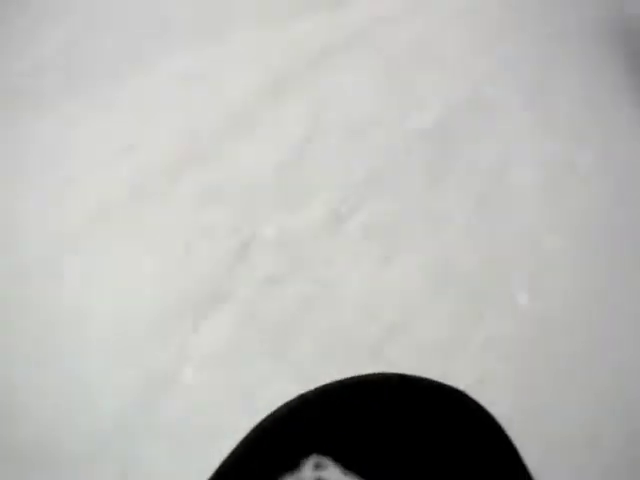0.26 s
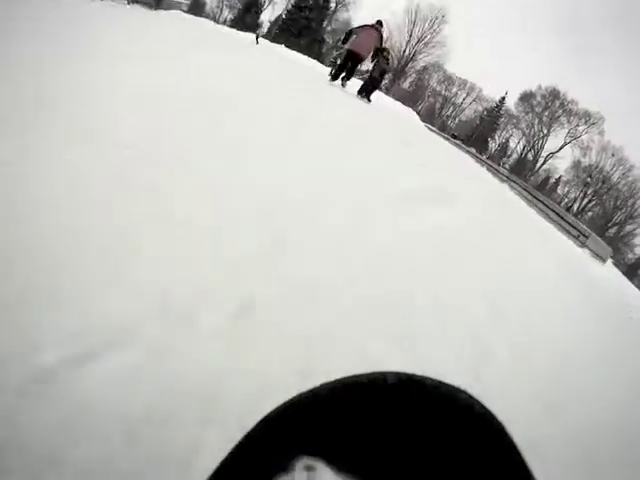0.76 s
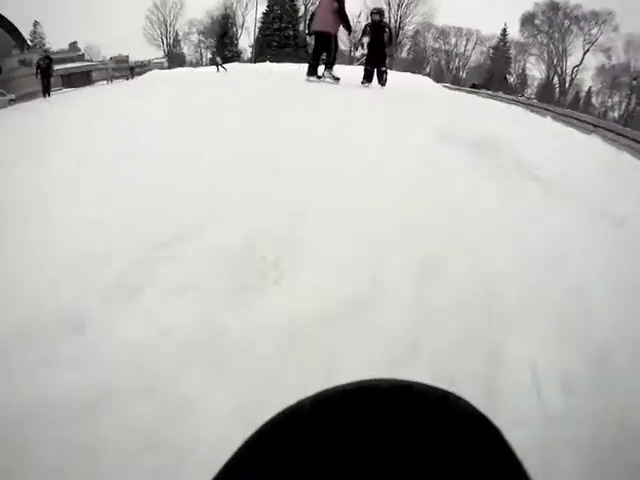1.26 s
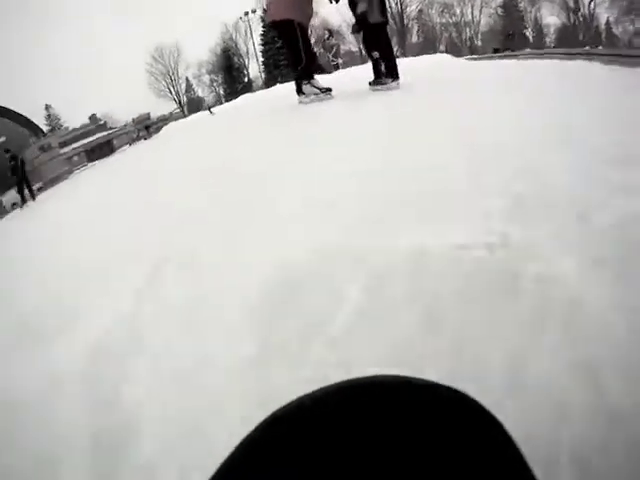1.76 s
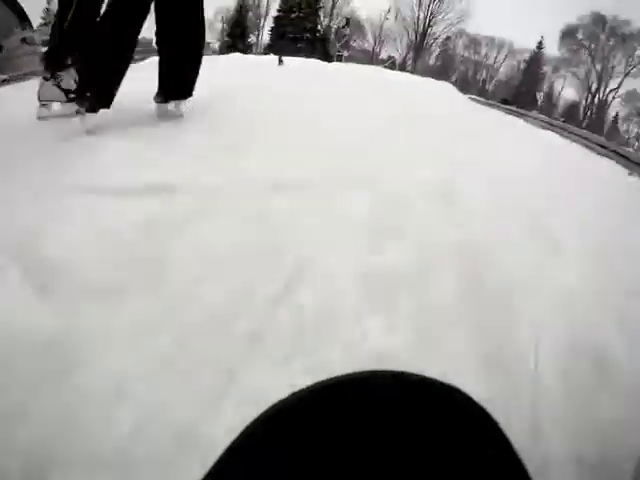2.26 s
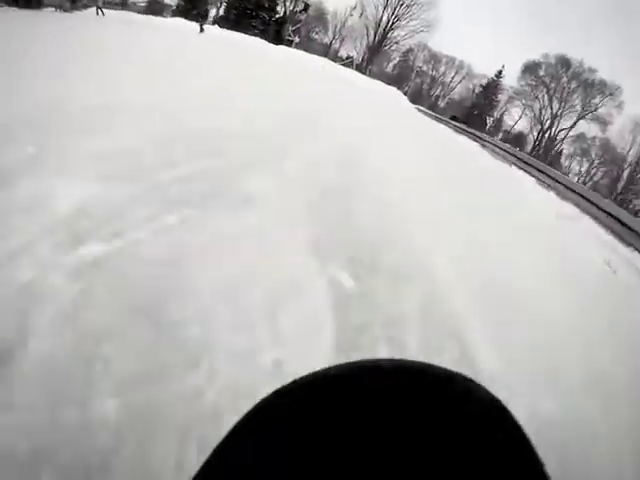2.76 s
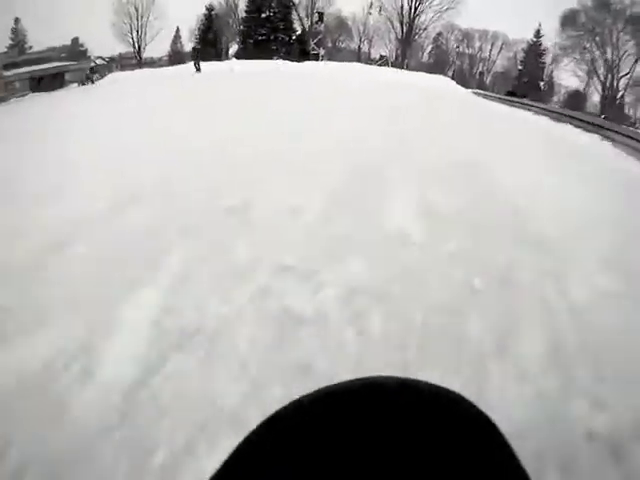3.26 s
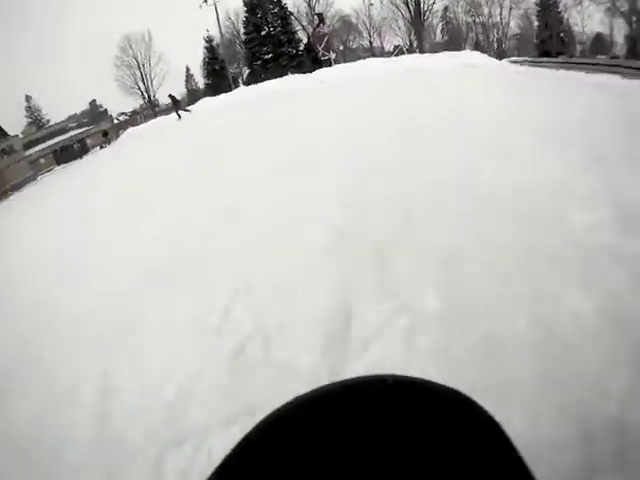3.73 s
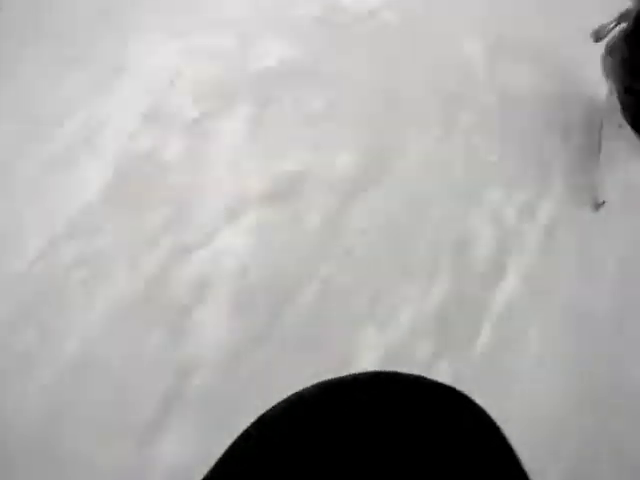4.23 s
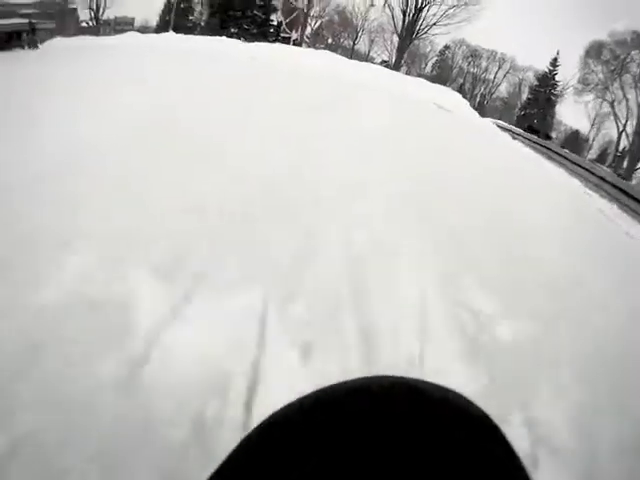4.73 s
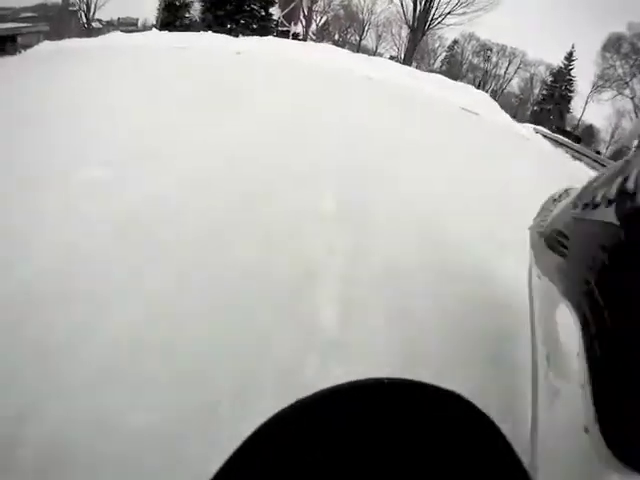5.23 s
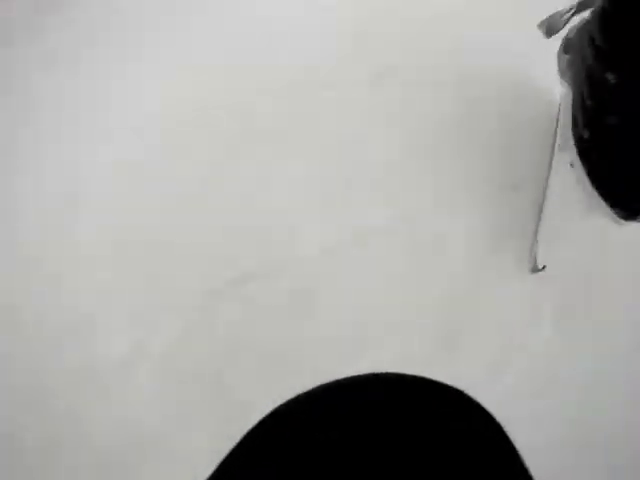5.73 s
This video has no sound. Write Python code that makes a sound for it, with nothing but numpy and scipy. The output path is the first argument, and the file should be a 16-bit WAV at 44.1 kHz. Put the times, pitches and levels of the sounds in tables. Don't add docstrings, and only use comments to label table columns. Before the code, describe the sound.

Very close, crunchy scraping of a skate blade on rough ice, bumping over ruts and spraying snow. Three pushes of about a second or more each grow to a hard, distorted peak and stop suddenly. Between them come a brief hush, a faint flick and grazing, and fluttering wind rumble. Open air, no echo, cheap harsh microphone.

```python
import sys
import numpy as np
from scipy import signal
from scipy.fft import rfft, irfft, next_fast_len
from scipy.io import wavfile
from scipy.ndimage import uniform_filter1d

SR = 44100
rng = np.random.default_rng(int(sys.argv[2]) if len(sys.argv) > 2 else 0)


def voltage_ratio(level):
    return 10 ** (np.asarray(level, float) / 20)


def wav_record(signal):
    frames = np.transpose(np.atleast_2d(signal))
    bounded = np.clip(frames, -1, 1)
    quanta = np.round(bounded * 32767).astype(np.int16)
    wavfile.write(sys.argv[1], SR, quanta)


N = 264153

# f/Hz, width/Hz, level/dB
BOOT_MODES = [(506, 190, -0.5), (715, 259, -0.36), (979, 136, 0.5), (1250, 280, -3), (1745, 660, -11.5)]
# f/Hz, width/Hz, level/dB
EDGE_MODES = [(1904, 470, -2.5), (2300, 790, -3.5), (2800, 252, 1.13), (3760, 360, -10), (4520, 820, -18.5)]
REST_LOAD_DB = -44


def rms_one(x):
    return x / np.sqrt(np.mean(x ** 2) + 1e-20)


def in_time(rows):
    s, *columns = np.transpose(rows)
    return [np.interp(np.arange(N) / SR, s, c) for c in columns]


def swells(rows):
    t = np.arange(N) / SR
    total = 0
    for centre, length, db in rows:
        phase = np.pi * np.clip((t - centre) / length, -.5, .5)
        total = total + db * np.cos(phase) ** 2
    return total


def drift(rate):
    r = np.exp(-16 * np.pi * rate / SR)
    white = rng.standard_normal(N // 8 + 2002)
    slow = signal.lfilter([1], [1, -2 * r, r * r], white)[2000:]
    return np.interp(np.arange(N) / 8, np.arange(len(slow)), rms_one(slow))


def coloured(spectrum):
    size = next_fast_len(N)
    hz, db = np.transpose(spectrum)
    grid = np.maximum(np.arange(size // 2 + 1) * SR / size, 1)
    shape = voltage_ratio(np.interp(np.log(grid), np.log(hz), db, left=-60, right=-80))
    return rms_one(irfft(rfft(rng.standard_normal(size)) * shape, size)[:N])


def body(force, modes, lean_hz=None, lean_db=0):
    out = 0
    for k, (hz, width, db) in enumerate(modes):
        r = np.exp(-np.pi * width / SR)
        zeros = [(1 - r * r) / 2, 0, (r * r - 1) / 2]
        poles = [1, -2 * r * np.cos(2 * np.pi * hz / SR), r * r]
        lean = 0 if lean_hz is None else lean_db * np.abs(np.log2(lean_hz / hz))
        out = out + (-1) ** k * voltage_ratio(db - lean) * signal.lfilter(zeros, poles, force + 1e-18)
    return out


def grit(per_s, spread_db):
    sizes = voltage_ratio(spread_db * np.minimum(rng.exponential(1, N), 5)) * rng.choice([-1, 1], N)
    return sizes * (rng.random(N) < per_s / SR)


def strides():
    # t/s, load/dB, edge bite/dB
    pushes = [
        [(0.0, -19.5, -27), (0.085, -25.5, -39)],
        [(0.96, -32, -36.5), (1.03, -31, -30.5), (1.44, -30.5, -31.5), (1.52, -27.5, -25.5),
         (1.604, -15, -20.5), (1.69, -23.5, -25.5), (1.83, -24.5, -28.5), (1.918, -14, -26),
         (1.988, -16, -26.5)],
        [(2.877, -32.5, -31.5), (2.963, -20.5, -25.5), (3.111, -33, -34.5), (3.221, -22, -19.5),
         (3.297, -31.5, -27.5), (3.39, -25, -27.5), (3.63, -30.5, -32.5), (3.86, -23, -32), (3.965, -22, -29)],
        [(4.69, -37, -36), (4.776, -25.5, -23), (4.842, -32, -33), (5.1, -32.5, -35), (5.37, -28, -35.5),
         (5.45, -19, -33.5), (5.53, -21, -27.5), (5.655, -21, -27), (5.683, -27, -33)],
    ]
    # t after lift/s, load/dB, edge bite/dB
    swing = [
        (0.016, -47, -52),
        (0.03, -47.5, -41),
        (0.07, -45, -37),
        (0.108, -49, -50),
        (0.22, -44.5, -49.5),
        (0.42, -44, -43.5),
        (0.62, -46.5, -40.5),
    ]
    # centre t/s, length/s, change/dB
    grazes = [(0.24, 0.12, 7), (0.36, .14, -6), (0.52, 0.27, 6), (0.8, 0.38, -6), (2.05, 0.14, 9.5),
              (2.5, 0.35, 10), (4.35, 0.33, 10.5), (4.53, .16, -8), (5.735, .12, -14), (5.83, 0.16, 9.5),
              (5.99, 0.35, 13.5)]
    rows = []
    for push in pushes:
        lift_s = push[-1][0]
        rows += list(push)
        rows += [(lift_s + s, load_db, bite_db) for s, load_db, bite_db in swing]
    load_db, bite_db = np.array(in_time(rows)) + swells(grazes) * [[0.6], [1]]
    lean_hz = 571.3 * 2 ** (0.0082 * (load_db - REST_LOAD_DB))
    return load_db, bite_db, lean_hz


def wind():
    # t/s, level/dB, flutter share/dB
    strength = [(0.0, -21, -10), (0.1, -42, -13), (0.2, -39.5, -9), (0.27, -15.5, -8.5), (0.9, -22, -5.5),
                (1.03, -29, -7.5), (1.45, -19, -3.5), (1.82, -23, -7), (2.01, -39.5, -5.5), (2.2, -15, -4),
                (2.9, -26, -3.5), (3.52, -21, -10), (3.91, -28.5, 0.5), (3.99, -52.5, -3), (4.2, -16.5, -7),
                (5.42, -27.5, -5), (5.65, -44, -2), (5.99, -17, -8)]
    # centre t/s, length/s, change/dB
    lone_gusts = [(0.28, .05, 4), (0.34, .09, -19), (0.41, 0.043, -2), (0.52, 0.11, -9), (0.58, .06, 4),
                  (0.635, 0.063, -3), (2.33, 0.26, -6), (2.52, 0.12, 3.5), (2.6, .08, 1), (2.68, 0.17, 2),
                  (2.91, 0.092, -2.5), (3.04, 0.15, 2.5), (3.32, 0.25, -3.5), (4.45, .04, 9),
                  (4.53, .16, -5), (4.74, 0.37, -3.5), (5.07, 0.19, -7), (5.21, 0.11, 3), (5.8, .24, 5)]
    # f/Hz, density/dB
    rumble_spectrum = [(20, -8), (45, -1.5), (100, 1), (180, -6.5), (260, -9), (420, -27.5)]
    # f/Hz, density/dB
    flutter_spectrum = [(150, 0), (260, -2.5), (400, -2.5), (600, -7), (800, -27.5), (1500, -25),
                        (3000, -53.5), (5500, -38)]
    rumble_db, flutter_db = in_time(strength)
    rumble_db = rumble_db + swells(lone_gusts)
    gusts = drift(33.0)
    rumble = rms_one(coloured(rumble_spectrum) * voltage_ratio(1.33 * gusts + 0.66 * drift(7.8)))
    flutter = rms_one(coloured(flutter_spectrum) * voltage_ratio(2.6 * gusts + 2.6 * drift(23.7)))
    return voltage_ratio(rumble_db) * (rumble + voltage_ratio(flutter_db + 3.0) * flutter)


def glide(boot_db, edge_db, lean_hz):
    # centre t/s, length/s, spray/dB
    snow = [(0.79, 0.22, 6), (1.27, 0.33, 17), (1.53, 0.45, 18), (2.06, .1, 7), (2.52, 0.46, 17.5),
            (2.95, .5, 14), (3.24, .3, 23), (3.42, .2, 12), (3.6, .3, 7), (2.29, 0.29, -17),
            (4.16, 0.17, -10), (4.33, 0.33, 11.5), (4.47, .14, -7), (4.72, 0.51, 11), (5.08, .3, -7.5),
            (5.8, 0.29, 2)]
    # f/Hz, density/dB
    spray_spectrum = [(1500, -10), (3000, 3), (4300, -4), (5300, -3), (6200, -14)]
    spray_db = -54 + swells(snow)
    chatter = drift(47.4) * np.clip(1 - 0.025 * (boot_db + 31), .3, 1)
    boot_force = grit(4000, spread_db=3.0) * voltage_ratio(2.7 * chatter + 2.5 * drift(30.6))
    boot = body(boot_force, BOOT_MODES, lean_hz, lean_db=4.0)
    boot = signal.sosfilt(signal.butter(2, 450, "high", fs=SR, output="sos"), boot)
    edge_force = grit(3500, spread_db=2.5) * voltage_ratio(2.9 * chatter + 3.1 * drift(79))
    edge = body(edge_force, EDGE_MODES)
    spray = coloured(spray_spectrum) * voltage_ratio(4.4 * chatter + 2.6 * drift(25))
    out = voltage_ratio(boot_db + 4.5) * rms_one(boot)
    out += voltage_ratio(edge_db + 4.5) * rms_one(edge)
    return out + voltage_ratio(spray_db + 3.0) * rms_one(spray)


def jolts(load_db, lean_hz):
    # t/s, peak level/dB, crack/dB, length/ms
    ruts_and_chips = [(0.038, 1.5, -11, 4.7), (0.052, 8, -13, 4.5), (0.073, 5, -16, 6.8), (0.142, -14, 1, 2.1),
                      (0.17, -11, -0.5, 4.4), (0.552, -8.5, -6.5, 7.2), (0.611, -3, -7.5, 5.4),
                      (0.622, -1, -3.5, 4.1), (0.713, -1.5, -10.5, 5.8), (0.742, -4, -6.5, 3.5),
                      (0.776, -11, -7, 3), (0.936, 9.5, -8, 2.93), (0.992, -8, -0.3, 6.8),
                      (1.167, 5.5, -18.5, 3.3), (1.236, -3, -9, 4.7), (1.298, 1.5, -11, 2.5),
                      (1.327, -3, -6.5, 5), (1.431, -1.5, -8, 5.3), (1.523, -4.5, -10, 7.8),
                      (1.536, 3.5, -9, 5.2), (1.563, -0.6, -6, 4.0), (1.603, -6.5, -7, 4.8),
                      (1.675, -10, -8, 3.1), (1.724, -5.5, -13, 5.5), (1.831, -1.5, -12, 4.2),
                      (1.878, 9, -29, 3.1), (1.907, 4, -24, 4.3), (1.921, 6, -25, 3.1), (1.941, 3, -13, 4.7),
                      (1.955, 3, -10, 12),
                      (2.036, -5.5, 0, 5), (2.464, -7.5, -11.5, 4.1), (2.591, 3.7, -14, 3.9),
                   (2.694, -4.5, -3.5, 3.2), (2.758, -7, -11, 2.9), (2.783, -1.5, -9.5, 5.7),
                   (2.803, 5, -10, 2.4), (2.851, 6, -16.5, 4.7), (2.939, -4, -14, 3.7),
                   (2.978, 3, -16, 6.6), (3.025, -6, -2, 3.8), (3.051, 7.5, -15, 3.5),
                   (3.086, 1.5, -6.5, 5.3), (3.109, 1.5, -11, 5.8), (3.131, -9, -8, 4.1),
                   (3.188, 1, -13, 9.3), (3.281, 3.5, -15, 4.6), (3.448, -2.5, -16, 6.2),
                   (3.527, 0.5, -11.5, 3.1), (3.618, 1, -5, 5.2), (3.647, 7.5, -9.5, 5.4),
                   (3.726, -4, -5.5, 2.2), (3.737, 1.5, -12.5, 4.9), (3.759, 6, -10, 1.84),
                   (3.792, -5, -11, 5.8), (3.83, -1, -6.5, 4.7), (3.859, -0.5, -8.5, 10.5),
                   (3.908, 0.5, -19, 5.9), (3.922, 8.5, -6.5, 3.9), (3.945, 5, -21, 5.1),
                      (4.024, -7.5, 1.5, 4.3), (4.039, -12.5, -1.5, 2.1), (4.305, -10, -8.5, 6.6),
                 (4.615, -14, -2, 4.6), (4.648, -16.5, 2, 2.7), (4.678, -4.5, -8.5, 2.4),
                 (4.693, 2, -13.5, 10), (4.728, -9, -5.5, 4.0), (4.768, -3, -7, 4.7), (4.783, 0, -23, 4.3),
                 (4.809, -6.5, -20, 4.7), (4.836, 7, -15.5, 3.45), (4.899, -7.5, -12, 2.7),
                 (4.932, 7.5, -17.5, 3.6), (4.983, -3, -10.5, 6.2), (5.006, 5.5, -13, 4.8),
                 (5.141, -6, -15, 7), (5.186, -4, -11, 4.6), (5.22, -5.5, -31, 6.1), (5.256, 0.3, -21, 6.2),
                 (5.282, -11, -22.5, 2.9), (5.33, -14, -21, 4.1), (5.36, 1, -17.5, 3.15),
                 (5.403, -4, -12, 7.7), (5.441, 3.5, -18, 4.2), (5.534, -7, -21, 1.84),
                 (5.586, 6.5, -32, 1.8), (5.604, 3.5, -30.5, 1.4), (5.666, -2.5, -20.5, 4.2),
                 (5.814, -10.5, -3, 3)]
    ruts = np.array(ruts_and_chips)
    s, db, crack_db, ms = ruts.T[:, :, None]
    at = np.round(s * SR).astype(int)
    thud_db = -3 - 0.7 * (load_db[at] - REST_LOAD_DB)
    thud_db = thud_db - 20 * voltage_ratio(2 * np.minimum(crack_db, 0))
    lean_hz = 0.9 * lean_hz[at]
    low, high = rng.standard_normal((len(s), 2, 1500)).transpose(1, 0, 2)
    u = np.minimum(np.arange(1500) / SR / (np.clip(ms, 1, 14) / 1000), 1)
    swell = np.sin(np.pi * u ** 0.62) ** 0.66

    push = voltage_ratio(db + thud_db) * np.sin(2 * np.pi * u) * np.sign(low[:, :1])
    thud = signal.sosfilt(signal.butter(2, [110, 520], "band", fs=SR, output="sos"), push)
    knock_share = np.sqrt(np.clip(1 - voltage_ratio(2 * crack_db), .02, 1))
    knock = voltage_ratio(db) * knock_share * body(swell * low, BOOT_MODES, lean_hz, lean_db=6.5)
    snap = voltage_ratio(-20) * swell ** 3.0 * np.diff(high, prepend=0, axis=1)
    crack = voltage_ratio(db + crack_db) * (body(swell * high, EDGE_MODES) + snap)
    out = np.zeros(N + 1500)
    for i, jolt in zip(at[:, 0], voltage_ratio(-1.2) * thud + voltage_ratio(11.0) * knock + voltage_ratio(11.5) * crack):
        out[i:i + 1500] += jolt
    return out[:N]


def creak(load_db, lean_hz):
    width_hz, waver_oct = 45, 0.16
    phase = 2 * np.pi * np.cumsum(lean_hz * 2 ** (waver_oct * drift(7))) / SR
    ring = 0
    for ratio, db in [(0.95, 1.5), (1.6, -1.5)]:
        ring = ring + drift(width_hz) * np.cos(ratio * phase) * voltage_ratio(db)
    return voltage_ratio(-22.5 + 1.44 * (load_db + 21)) * rms_one(ring)


def scene():
    load_db, bite_db, lean_hz = strides()
    blade = glide(load_db, bite_db, lean_hz)
    return (wind() + blade + jolts(load_db, lean_hz) + creak(load_db, lean_hz))[None]


def gain_control(x, knee_db, back_db_per_s, attack_s):
    over = np.maximum(20 * np.log10(np.abs(x) + 1e-9) - knee_db, 0)
    ramp = back_db_per_s * np.arange(N) / SR
    held = np.maximum.accumulate(over + ramp) - ramp
    r = np.exp(-1 / (attack_s * SR))
    return x * voltage_ratio(-signal.lfilter([1 - r], [1, -r], held))


def low_pass(x, hz):
    return signal.sosfiltfilt(signal.ellip(10, .1, 70, hz, fs=SR, output="sos"), x)


def top_band(x, open_db, kept_db):
    below = low_pass(x, 15250)
    top = low_pass(x, 16450) - below
    level = np.sqrt(uniform_filter1d(top ** 2, size=600))
    return below + voltage_ratio(kept_db) * top * np.clip(level / voltage_ratio(open_db), 0, 1) ** 3.0


def top_cut(x):
    return signal.sosfilt(signal.butter(12, 16510, fs=SR, output="sos"), x)


def record(dry):
    sample_hz, hold_count = 12000, 4
    x = gain_control(dry[0], knee_db=-3.5, back_db_per_s=165, attack_s=0.0091)
    slow = np.clip(signal.resample_poly(x, sample_hz // 300, SR // 300), -.9, .9)
    steps = np.repeat(slow, hold_count)
    held = signal.resample_poly(steps, SR // 300, sample_hz * hold_count // 300)
    held = np.pad(held, (0, 8))[:N]
    mix = top_band(held, open_db=-37, kept_db=-10)[None]
    return top_cut(mix)


dry = scene()
out = record(dry)
wav_record(out)
```